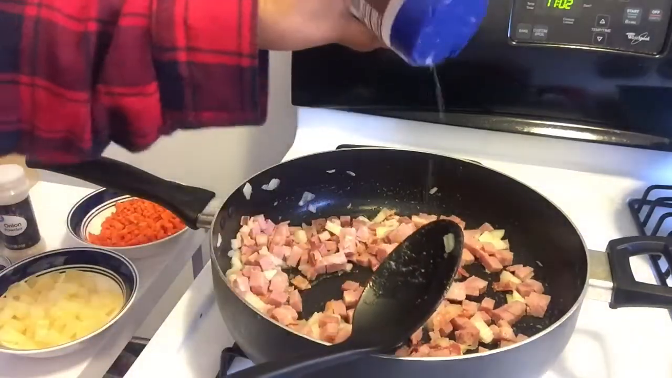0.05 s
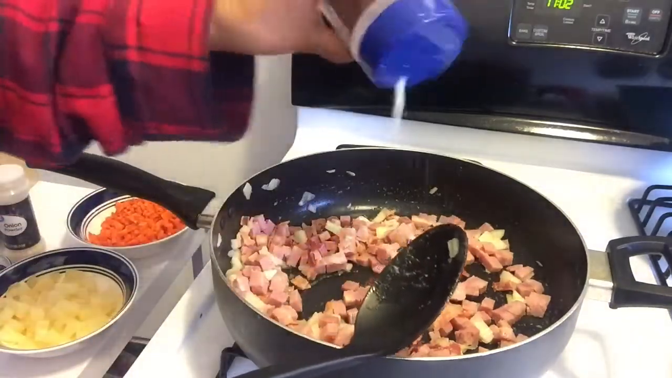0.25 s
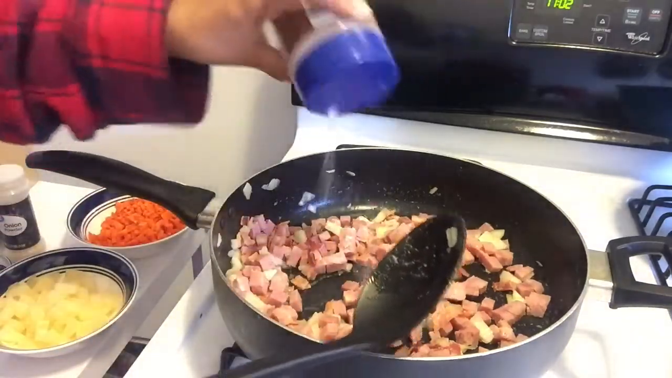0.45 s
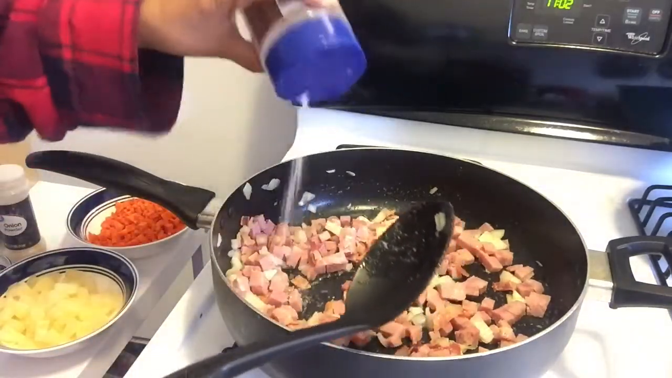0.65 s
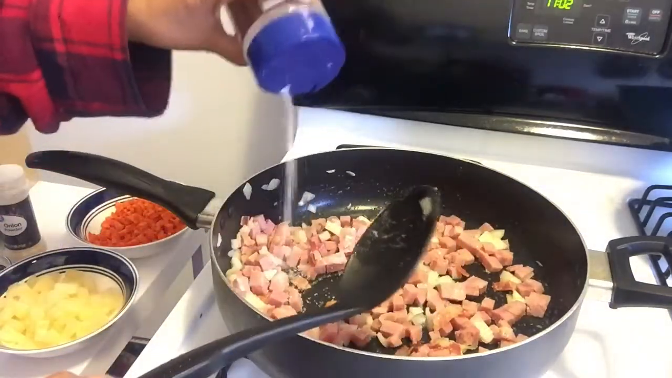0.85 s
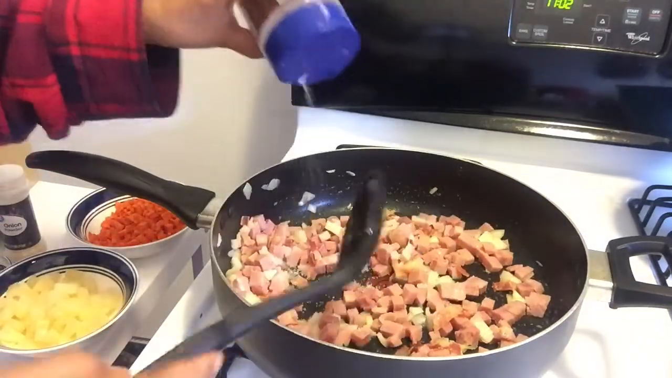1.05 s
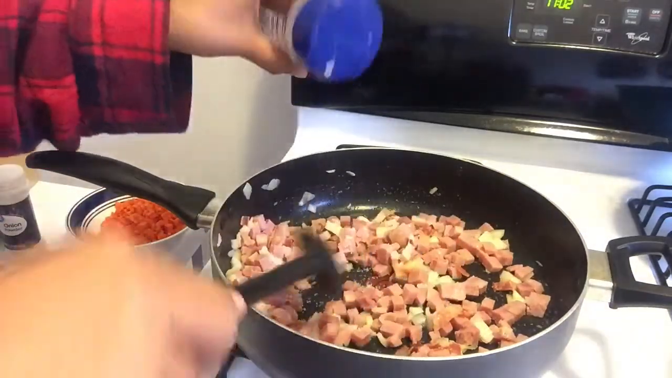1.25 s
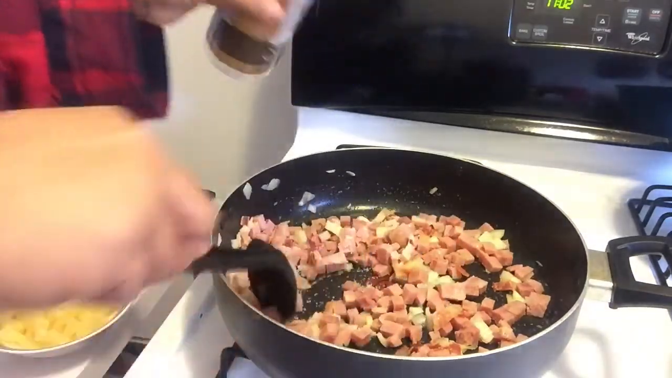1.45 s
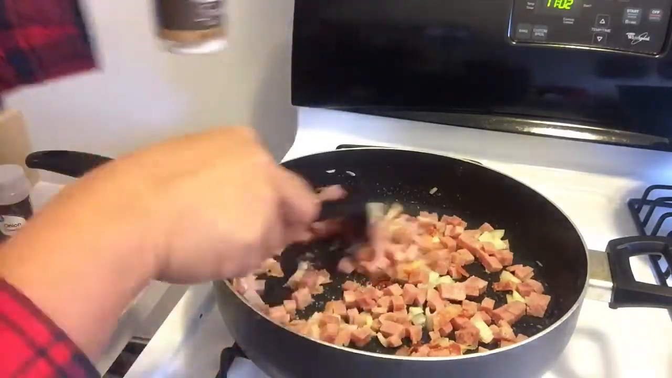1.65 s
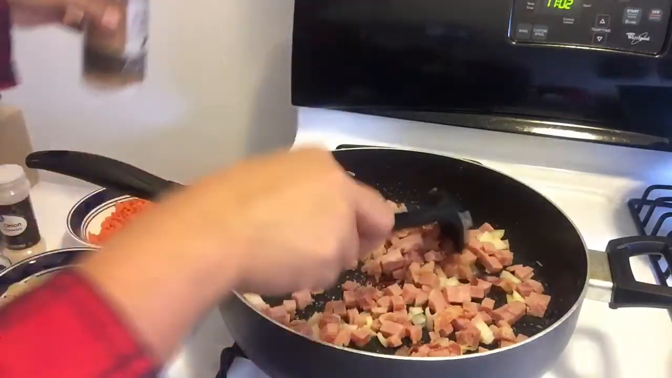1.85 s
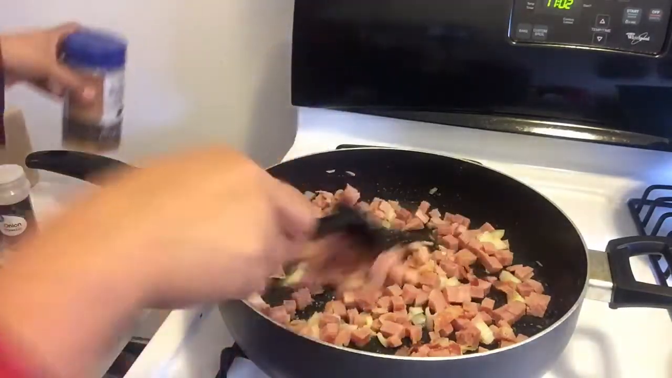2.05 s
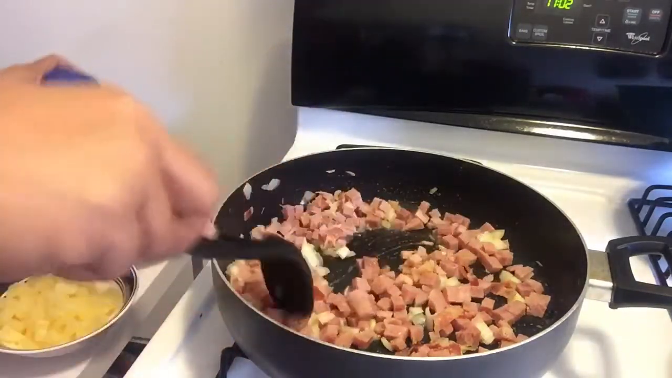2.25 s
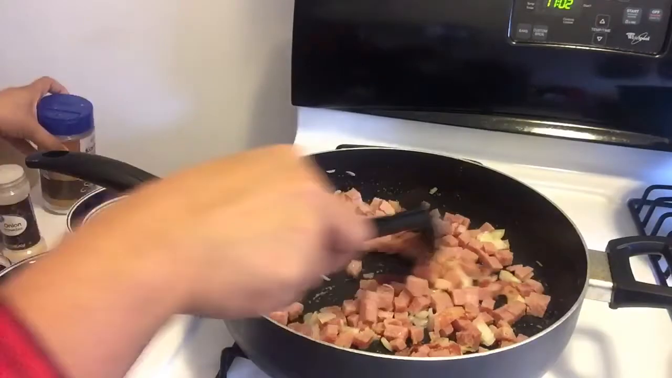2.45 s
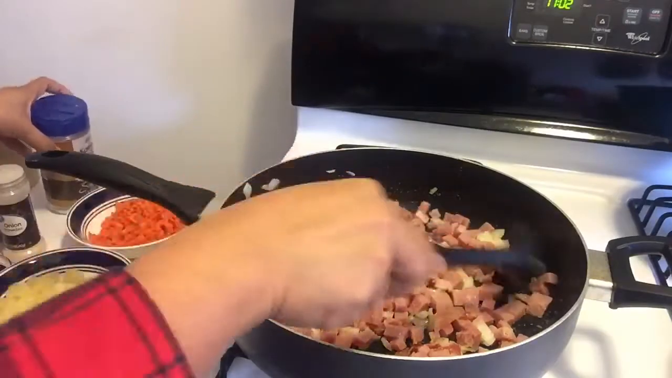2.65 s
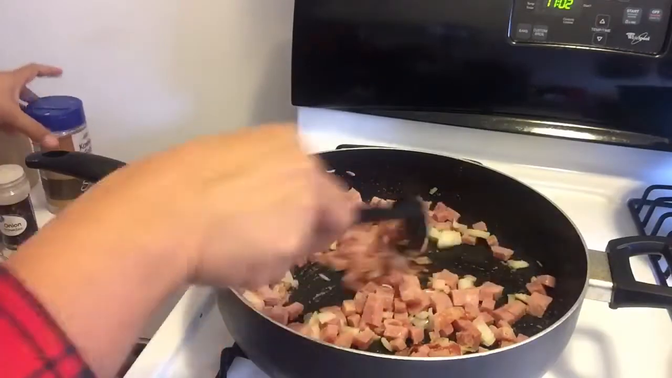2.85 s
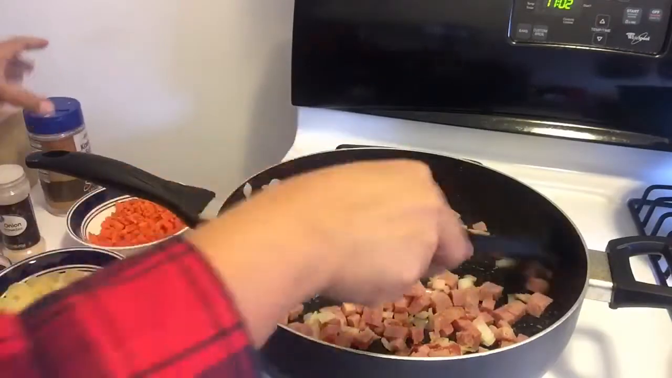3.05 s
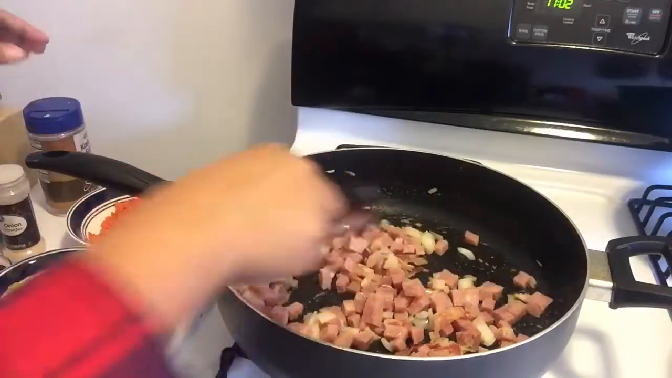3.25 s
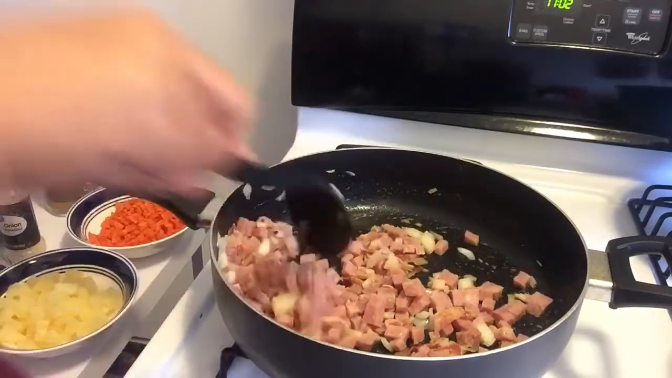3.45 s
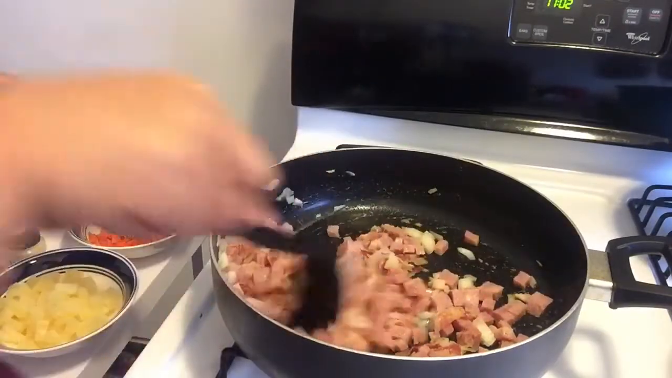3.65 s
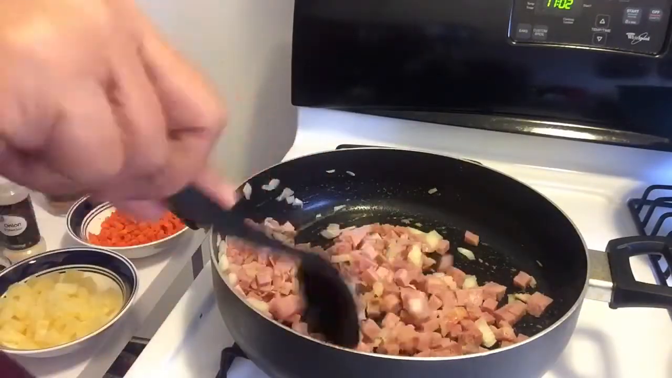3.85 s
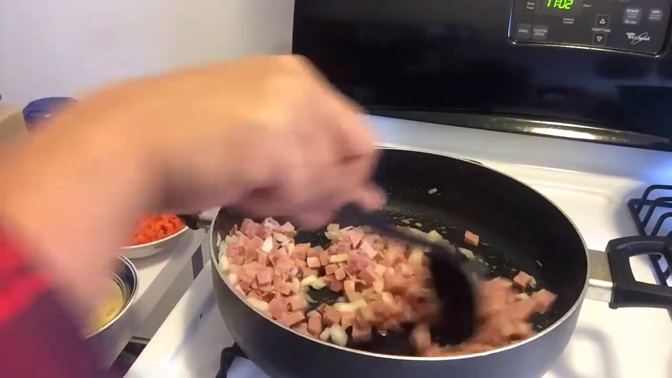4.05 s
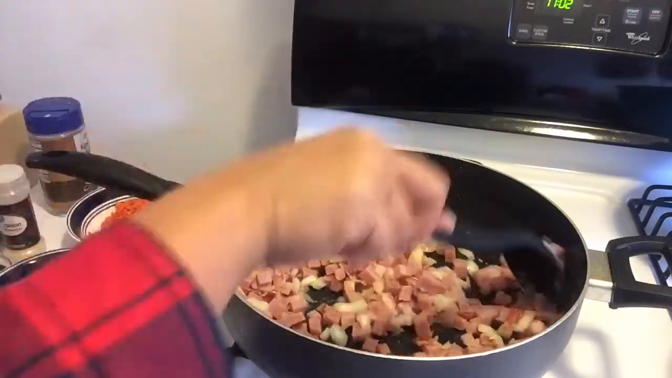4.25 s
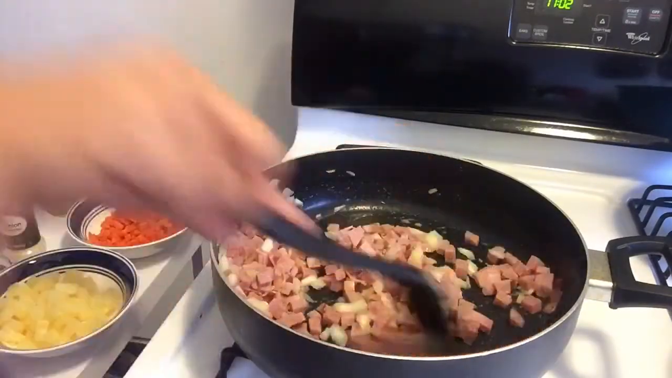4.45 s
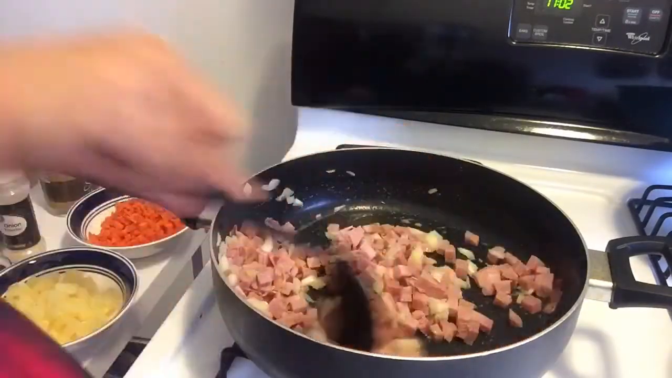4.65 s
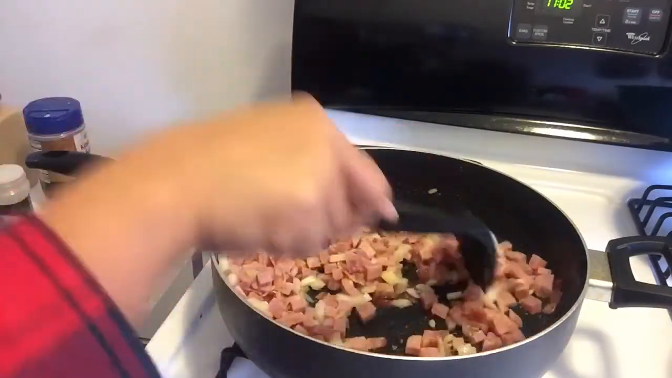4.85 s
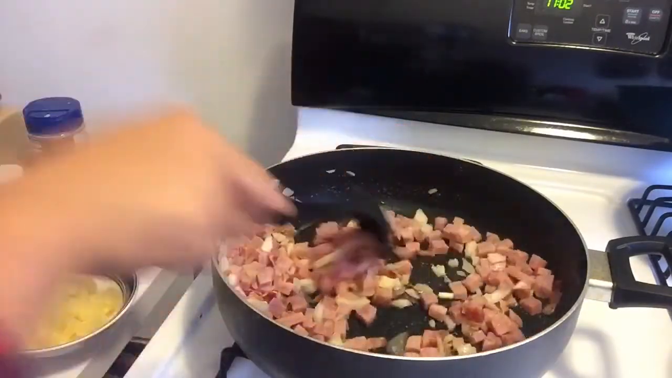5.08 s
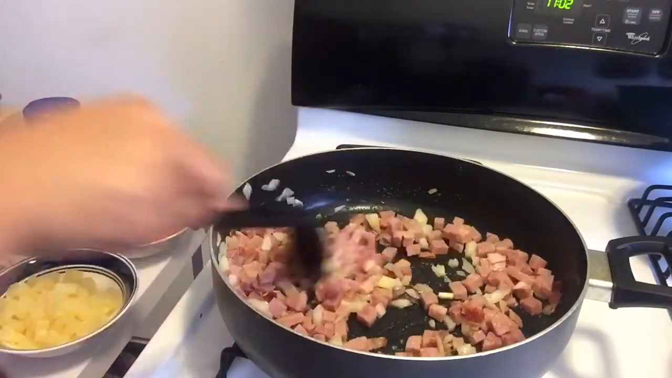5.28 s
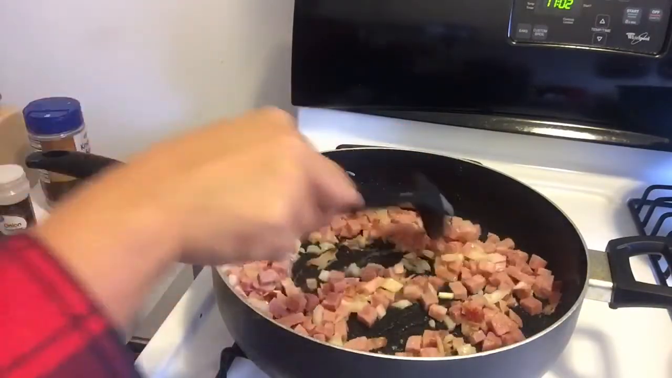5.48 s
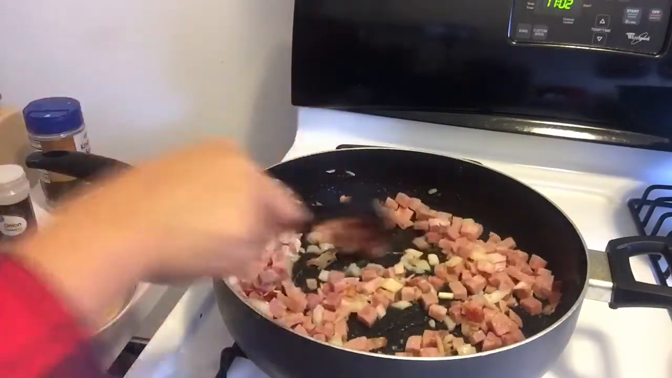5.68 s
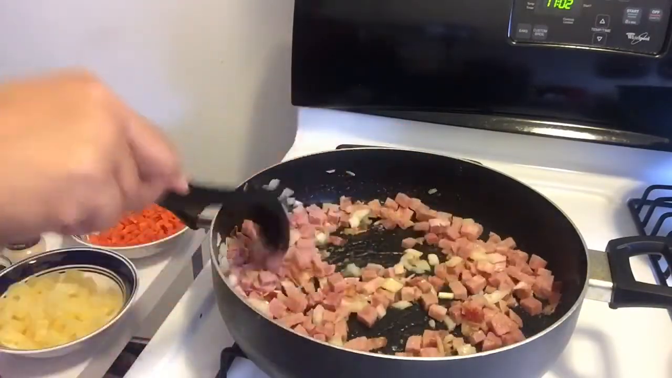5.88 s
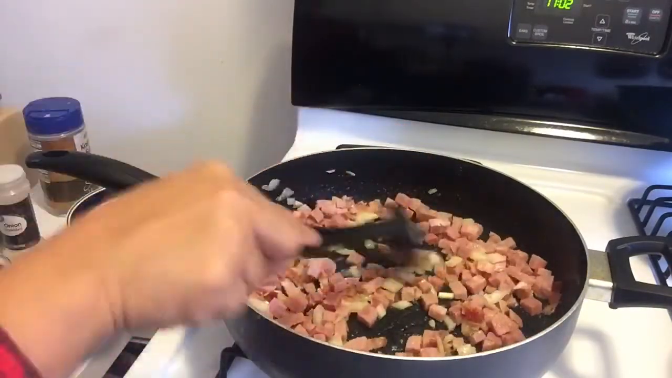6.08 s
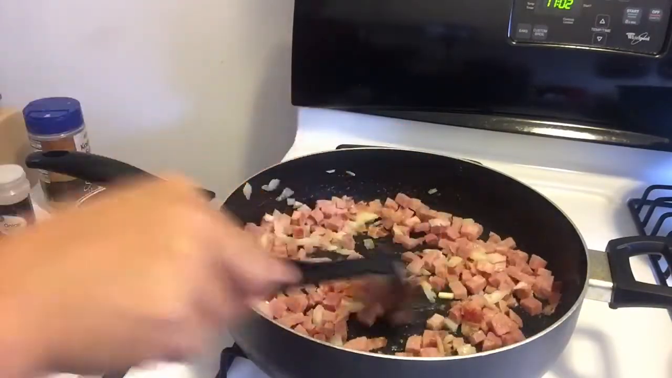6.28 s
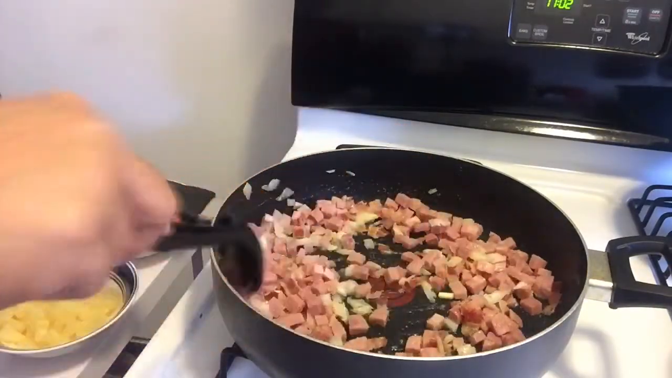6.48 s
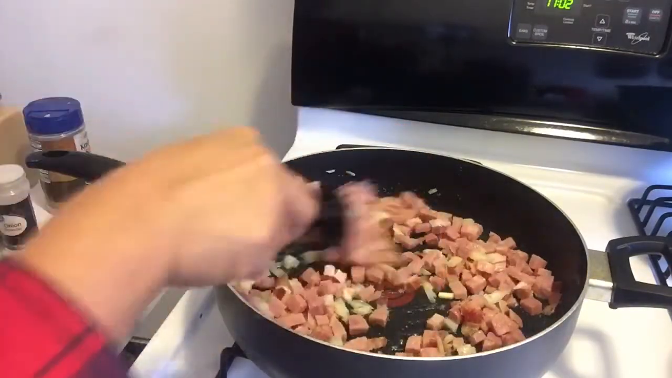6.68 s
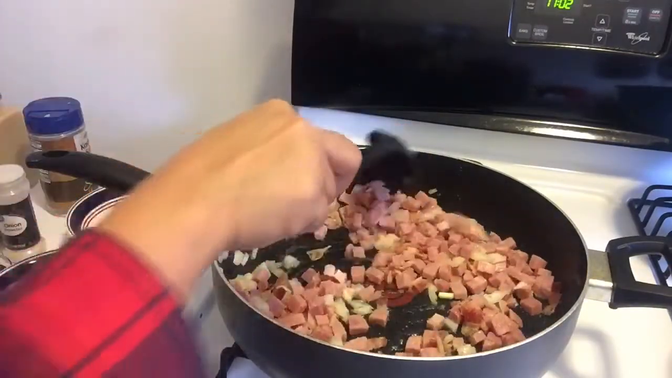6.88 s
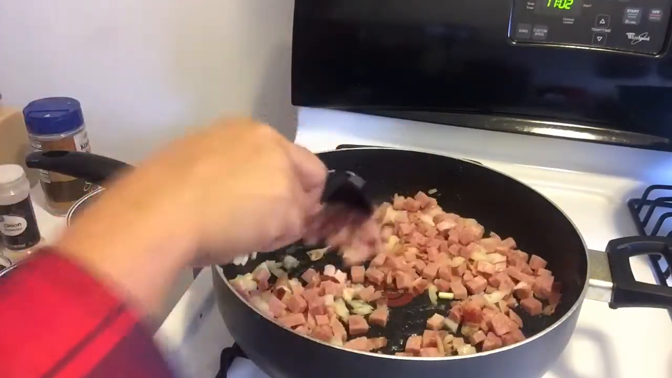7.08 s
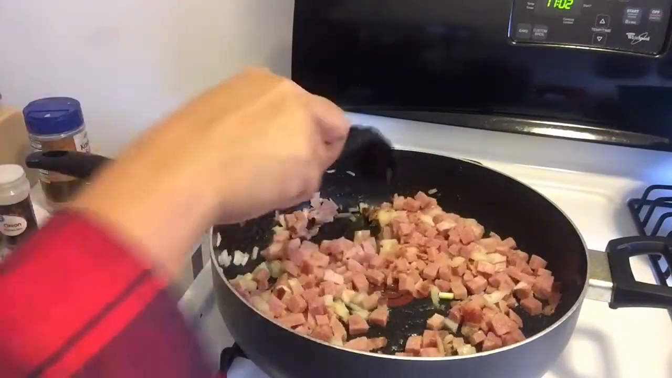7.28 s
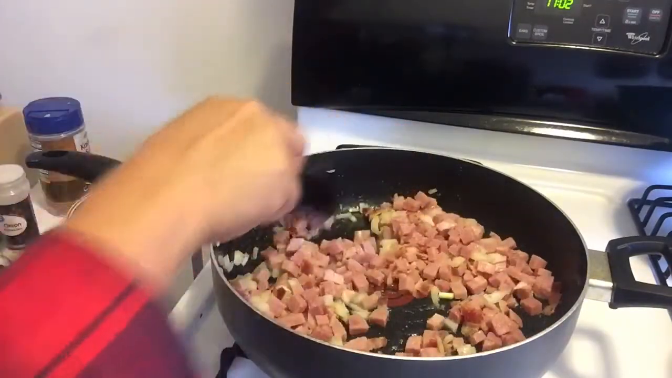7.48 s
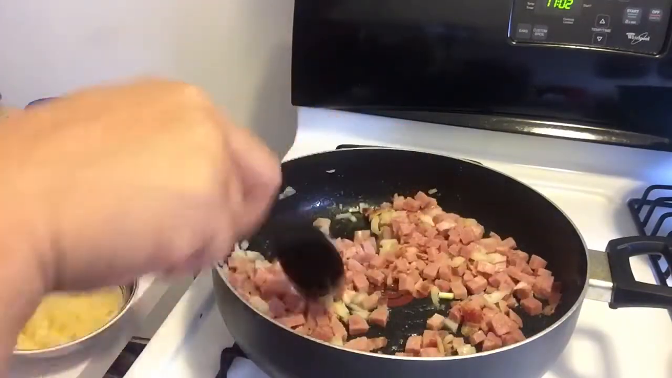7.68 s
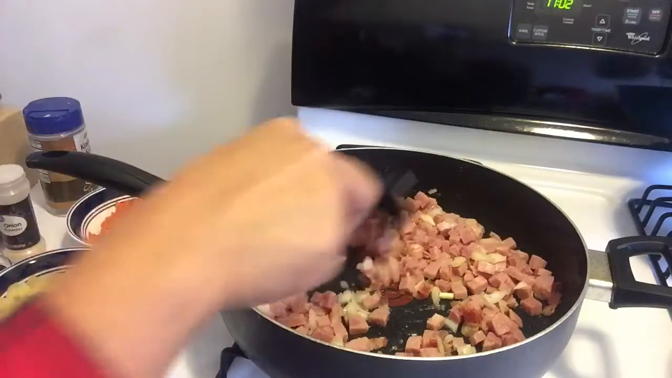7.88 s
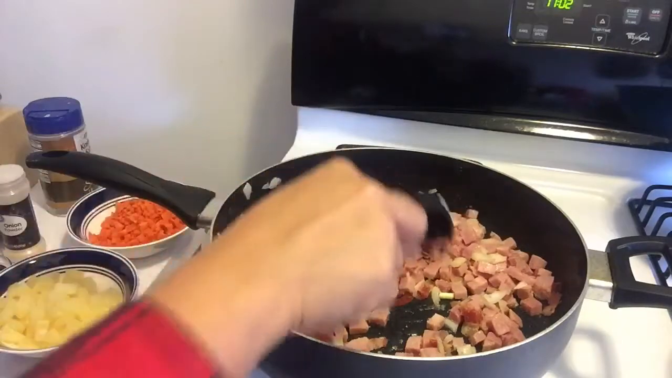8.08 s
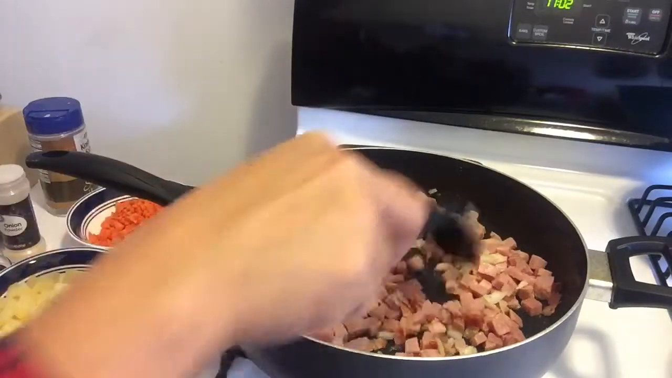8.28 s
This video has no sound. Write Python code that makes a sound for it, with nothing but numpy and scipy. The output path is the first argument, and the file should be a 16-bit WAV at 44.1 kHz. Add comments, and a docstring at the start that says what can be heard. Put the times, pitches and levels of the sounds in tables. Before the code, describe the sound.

A few light shakes of salt, followed by a plastic spoon knocking and swishing through chopped food in a pan.

```python
"""Salt patters into a frying pan, then a plastic spoon clacks and scrapes through diced food.
The crystals land in bright showers. The spoon drags on the coating, swishes over dice and salt and
shakes the pan on its grate; each knock sets the pan ringing, damped by the food. Wet dice tick and
pop as they let go. Behind it all are a few soft low bumps, the short echo of a small kitchen and
the faint hiss of the room and one close microphone."""
import sys
import numpy as np
from scipy import signal
from scipy.fft import rfft, irfft, next_fast_len
from scipy.io import wavfile
from scipy.ndimage import uniform_filter1d, map_coordinates

SR = 44100
rng = np.random.default_rng(int(sys.argv[2]) if len(sys.argv) > 2 else 0)


def int16_out(signal):
    """Quantize to a 16-bit WAV file."""
    q = np.round(np.clip(np.atleast_2d(signal).T, -1, 1) * 32767)
    wavfile.write(sys.argv[1], SR, q.astype(np.int16))


N = 367353

# Each row: start, rise and hold in seconds, base fade in dB per second, levels in dB of drag, swish,
# fine salt and pan rattle, then the spoon's hollow and the rattle's pitch in Hz.
SPOON_STROKES = [(1.446, 0.141, 0.0055, 400, -70, -55, -55.5, -86, 1800, 250),
                 (1.573, 0.016, 0.068, 187, -38, -44.5, -58, -55.5, 1400, 340),
                 (1.58, 0.076, .09, 249, -56.5, -46.5, -49.5, -62, 1650, 420),
                 (2.005, 0.021, 0.012, 297, -65, -91, -90, -61.5, 900, 497),
                 (2.043, 0.041, 0.0059, 199, -41, -62.5, -85, -62.5, 872, 540),
                 (2.049, .07, 0.0088, 350, -32, -60, -63, -54, 1200, 540),
                 (2.372, 0.015, 0.013, 257.5, -26.5, -39.5, -53, -35.5, 1120, 490),
                 (2.508, .022, 0.0063, 232.5, -28.5, -42, -54.5, -33.5, 1100, 440),
                 (2.766, 0.083, 0.043, 219.5, -65.5, -70.5, -75.5, -70, 1350, 310),
                 (2.972, 0.0066, 0.0043, 400, -65, -92, -88, -48.5, 1000, 340),
                 (3.009, 0.023, 0.053, 302, -70, -98, -97, -53.5, 900, 300),
                 (3.122, 0.011, 0.02, 145, -48.5, -55.5, -63.5, -60, 2250, 305),
                 (3.13, 0.05, 0.071, 296, -46, -42.5, -52, -68.5, 2200, 256),
                 (3.24, 0.027, 0.011, 303, -49.5, -64, -80, -65, 1100, 399),
                 (3.335, 0.014, 0.0065, 300, -62, -58, -75.5, -83.5, 1780, 340),
                 (3.372, .01, .02, 504, -44.5, -53, -70.5, -60.5, 1690, 505),
                 (3.412, 0.022, .02, 251.5, -68, -62, -67.5, -72.5, 1900, 240),
                 (3.67, 0.013, 0.014, 301.5, -55.5, -75, -81, -46, 950, 234),
                 (3.708, .012, 0.013, 267, -30.5, -44, -60.5, -33.5, 1900, 330),
                 (3.9, 0.051, 0.012, 304, -64.5, -72, -79.5, -57, 1750, 205),
                 (3.959, 0.0074, 0.0046, 403, -27.5, -46, -66, -49.5, 1570, 338),
                 (3.965, 0.023, 0.028, 302, -59.5, -70.5, -85, -40, 1570, 338),
                 (4.036, .01, .005, 216, -35.5, -41.5, -60, -34, 1690, 260),
                 (4.296, 0.021, 0.0027, 304.5, -74.5, -66, -87.5, -77, 2970, 213),
                 (4.324, 0.016, 0.02, 153, -88, -95, -95, -60, 1860, 195),
                 (4.442, .05, .005, 200, -76, -68, -77, -90, 1900, 220),
                 (4.746, 0.0081, .005, 350, -29, -40, -56.5, -35.5, 1180, 370),
                 (4.801, 0.0071, .005, 232, -40, -50.5, -67.5, -37.5, 1080, 440),
                 (5.016, 0.078, 0.011, 102, -75, -69.5, -77, -68, 1240, 270),
                 (5.335, 0.046, 0.0059, 400, -70, -62, -73, -65.5, 1980, 190),
                 (5.383, .06, 0.026, 200, -75.5, -64, -69, -67, 1400, 190),
                 (5.718, 0.0065, 0.0026, 194, -30, -45.5, -71, -42, 1150, 536),
                 (5.743, .03, 0.006, 258, -32, -47.5, -63, -48.5, 1370, 520),
                 (6.0, 0.06, .01, 97, -71, -71.5, -72, -76, 1500, 348),
                 (6.584, 0.0053, 0.0043, 296.5, -32.5, -58, -81, -57, 1600, 330),
                 (6.626, .06, .15, 399.5, -71.5, -61.5, -67.5, -72.5, 1800, 290),
                 (7.006, 0.017, 0.012, 450, -57, -56.5, -83, -60, 1200, 330),
                 (7.119, 0.039, .02, 203, -87, -70.5, -82, -77, 1400, 200),
                 (7.422, 0.043, 0.0054, 348.5, -46.5, -65, -68.5, -51.5, 1000, 270),
                 (7.491, 0.078, .005, 303.5, -46.5, -47, -66, -77, 1600, 310),
                 (7.6, 0.03, 0.017, 201, -80, -85, -90, -62, 1360, 341),
                 (7.609, 0.01, 0.0027, 404, -48, -48, -62, -63, 1360, 390),
                 (7.831, 0.015, 0.0047, 150, -69, -68.5, -68.5, -77, 1900, 390),
                 (7.907, 0.031, .005, 250, -81, -68, -79, -85, 1500, 320),
                 (8.16, 0.05, .005, 247, -72, -74, -93.5, -75, 1440, 290),
                 (8.231, 0.061, 0.0041, 603, -68, -69.5, -78, -79, 1300, 270)]
# Multipliers on a stroke's fade, for drag, swish, fine salt and rattle.
FADE_SCALES = [1.064, 1.25, 1.1, .7]
# Each row: start in seconds, level in dB, clack and upper clack in Hz, then trims in dB for
# upper clack, grate, thud, crack, pan ring and rim ring.
SPOON_KNOCKS = [(1.579, -18, 1270, 2900, -9.5, -19.5, -21, -18, -12, -13.5),
                (2.378, -5, 1298, 3170, -5.5, -30, -18.5, -15, -12.5, -29),
                (2.519, -21, 1357, 2370, -25, -13, 1, -14, -6, -29),
                (2.988, -45, 580, 2570, -28, -13.5, 5, -42, -20, -11),
                (3.123, -29.5, 2200, 2230, -29, -33, -22, -23, -14, -22),
                (3.377, -39.5, 1300, 2780, 4, -33, -19.5, -25, -14, -36.5),
                (3.444, -43, 1890, 2650, -3.5, -25.5, -28, -14.5, -18, -43),
                (3.677, -45.5, 933, 2160, 3, -8, -6.5, -16, -21.5, 1),
                (3.713, -8.5, 1538, 3100, 5.5, -30.5, -18.5, -14.5, -13, -30.5),
                (3.958, -9.5, 1884, 2800, 2, -42, -18.5, -11.5, -14, -18.5),
                (4.043, -18, 1290, 2530, -12, -29, -16, -14.5, -25, -26),
                (4.076, -22.5, 1710, 2380, 7, -28, -21, -22.5, -12.5, -27),
                (4.745, -18, 487, 1500, 1, -3.5, -18, -21.5, -5.5, -35.5),
                (4.803, -19, 1062, 2270, -15, -14, -16, -37, -18, -25),
                (5.7158, -11.5, 954, 1898, -1, -41.5, -16, -22, -16.5, -11),
                (6.581, -9, 1802, 2286, -15, -33.5, -26.5, -19, -21, -27),
                (7.015, -60, 1114, 2700, -2, -30, -20, 8.5, -23, -29),
                (7.442, -36, 970, 2665, 6.5, -3.5, -6.5, 5, -3, 3),
                (7.559, -30, 1746, 3230, 0, -44, -38, -29, -22, -19),
                (7.627, -30, 1346, 3080, -25, -43, -21, -29, -30, -36),
                (7.846, -48.5, 1138, 3000, -3, -15, -25, -25, -4.5, -19)]
# Each row: pitch in Hz, level in dB, seconds to fall 60 dB.
PAN_MODES = [(158, 0.5, 0.14), (240, -7, 0.12), (352.3, -10.5, 0.4), (460, -2.5, .15), (529, -7.5, 0.1),
             (659, 4, 0.031), (996, -0.5, 0.31), (1175, 6, 0.046), (1366, -2.5, 0.027), (1572, -2, 0.11),
             (1728, -11, 0.18), (2840, -1.5, 0.039), (3340, -15, 0.14), (4470, -11.5, 0.14),
             (5416, -19.5, 0.098)]
# Low resonances of pan and grate. Each row: centre in Hz, width in Hz, level in dB.
RATTLE_MODES = [(125.3, 41, -0.5), (208, 30, -3), (327, 30, -1), (495, 86, -7), (575.6, 120, -4.5)]
# Each row: start, rise and hold in seconds, fade in dB per second, level in dB, then trims in dB
# for brightness and hollow pan tone.
SALT_SHAKES = [(-.06, 0.12, 0.017, 450, -55.5, -4, -16), (0.18, 0.029, 0.0038, 271, -67, 0.5, -9),
               (0.275, 0.087, .01, 202, -49, 0, -11), (0.356, 0.057, .01, 258.5, -47.5, -2.5, -16),
               (0.443, 0.1, 0.0076, 135, -48, -5.5, -11), (0.579, 0.1, 0.027, 99, -51.5, -4.5, -8),
               (0.793, 0.042, .02, 250, -62.5, -2.5, -11), (0.953, 0.016, 0.0042, 260, -57, -12, -11),
               (1.047, .06, .05, 144, -78, -9, -20)]
# Each row: start in seconds, level in dB, pitch in Hz.
DICE_TICKS = [(.2099, -56, 1490), (.8275, -39.5, 4320), (.9647, -46.5, 4500), (1.4296, -53, 4300),
              (2.8099, -39.5, 4660), (3.2251, -27.5, 4130), (3.3348, -40, 5600), (3.4038, -34, 2840),
              (4.3256, -44, 3160), (4.4851, -53.5, 3390), (5.1161, -49, 5150), (5.3749, -44, 4200),
              (5.4502, -41, 6120), (6.0721, -49, 6050), (6.4099, -50.5, 5460), (6.692, -48, 6050),
              (6.7121, -43, 3420), (6.7473, -44, 4320), (6.7823, -44, 5720), (7.1761, -40.5, 5200),
              (7.877, -54, 3010), (7.9249, -44, 8900), (7.9462, -47, 9050)]
# Each row: ratio to the tick's pitch, linear gain.
POP_PARTIALS = [(1, 1), (1.2, .6), (.85, .4), (1.7, .2)]
# Each row: time in seconds, level in dB, pitch in Hz.
LOW_BUMPS = [(2.4, -62, 50), (2.55, -67, 70), (3.73, -62, 50), (4.05, -64, 45), (4.37, -64, 45.3),
             (4.77, -63, 45), (7.237, -54, 56.5), (7.769, -64, 94.8)]
# Each row: frequency in Hz, seconds for the echo to fall 60 dB.
KITCHEN_DECAY = [(100, 0.68), (300, 0.06), (800, 0.3), (2000, 0.25), (5000, 0.28), (12000, 0.22)]
# Tone curves for the noise layers. Each row: frequency in Hz, level in dB.
DRAG_EQ = [(180, -42), (300, -19.5), (666, -3.5), (1030, 0), (1140, -5), (1400, -2.5), (1520, -7.5),
           (1780, -1), (2720, -6), (3420, -9), (9000, -32), (11700, -59), (19800, -120)]  # spoon on the coating
SWISH_EQ = [(1650, -28.5), (2800, -3), (3240, -5.5), (3490, -0.5), (5180, -3), (5880, -0.5), (6850, -4),
            (8410, -16.5), (9000, -20), (11700, -41.5), (19800, -120)]  # spoon over the food
FINE_SALT_EQ = [(5000, -30.5), (8500, 0), (9600, -1), (10500, -6.5), (12500, 1), (16000, -10.5)]  # salt under the spoon
SHOWER_EQ = [(410, -53), (700, -22), (1040, -6), (1330, -5.5), (1640, -8), (2240, -2), (2800, -0.5),
             (4430, 5.5), (4920, 2.5), (6570, 5), (10400, -12), (11800, -6), (16000, -12)]  # salt landing
HISS_EQ = [(12, -35.5), (20, -13), (53, -1), (310, -4.5), (399, -5), (873, -9), (1030, -7.5), (1120, -6),
           (1220, -12), (1400, -8), (1860, -10), (2200, -11), (6720, -16), (13900, -25.5), (16000, -28)]  # room and microphone


def spoon_knocks():
    """Each blow is a short plastic clack, a crack, and the pan ringing under damping food."""
    clack_cycles, dull_hz = 33, 1000  # cycles to fall 60 dB; lower clacks decay like one at dull_hz
    out, t = np.zeros(N), np.arange(SR // 2) / SR
    crack_band = signal.butter(2, [3200, 7000], "bandpass", fs=SR)
    push = 1 - np.exp(-(t / 0.0011) ** 2)  # plastic gives a little before it pushes
    bloom = 1 - np.exp(-t / .003)
    for start, db, hz, upper_hz, *trims in SPOON_KNOCKS:
        upper_db, grate_db, thud_db, crack_db, pan_db, rim_db = trims
        noise, luck = rng.standard_normal((2, len(t)))
        t60 = clack_cycles / max(hz, dull_hz)
        lower = ring(hz, t60, t) + .5 * ring(0.68 * hz, t60, t) + .5 * ring(1.2 * hz, t60, t)
        upper = (ring(upper_hz, 0.52 * t60, t) + 0.4 * ring(.8 * upper_hz, 0.63 * t60, t)
                 + 0.3 * ring(1.25 * upper_hz, 0.87 * t60, t))
        clack = push * (lower + amp(upper_db) * upper)
        burst = noise * amp(crack_db - 60 * t / 0.013) * (.3 + push)
        crack = 4 * signal.lfilter(*crack_band, burst)
        pan = np.zeros(len(t))
        for (f, mode_db, life), scatter_db in zip(PAN_MODES, 2 * luck):
            # where and how flat the spoon lands decides which family of modes it feeds
            feed_db = grate_db if f < 260 else thud_db if f < 700 else rim_db if f < 1100 else pan_db
            pan += amp(mode_db + scatter_db + feed_db) * ring(f, life, t)
        add(out, start - .0004, amp(db) * (0.86 * clack + crack + 0.57 * pan * bloom))
    return out


def spoon_strokes():
    """The spoon's edge drags on the coating, swishes over dice and salt, and rattles the pan."""
    *levels_db, hollow_hz, rattle_hz = np.transpose(SPOON_STROKES)[4:, :, None]
    gains = [amp(db) * gestures(SPOON_STROKES, scale)[0] + 1e-9
             for db, scale in zip(levels_db, FADE_SCALES)]
    drag_env, swish_env, salt_env, rattle_env = [per_sample(np.linalg.norm(g, axis=0)) for g in gains]
    rattle_env = uniform_filter1d(rattle_env, size=700)  # the heavy pan is slower
    _, fading_s = gestures(SPOON_STROKES)
    settling_hz = rattle_hz * 2 ** (-2 * fading_s)  # sinks two octaves a second as the pan settles
    rattle_centre = np.maximum(follow_loudest(settling_hz, gains[3]), 120)
    drag_centre = follow_loudest(hollow_hz, gains[0])
    drag = grit(drag_tone, spread_db=2.6, lump_db=1.5, patchy_db=4.0)
    drag = hollow(drag, drag_centre, lift_db=4, octaves=0.49, under_db=5)
    rattle = grit(rattle_tone, spread_db=2.8, lump_db=3.5, patchy_db=1.5)
    rattle = hollow(rattle, rattle_centre, lift_db=11.5, octaves=0.66, under_db=1.44)
    swish = grit(eq(SWISH_EQ), spread_db=2.0, lump_db=1.5, patchy_db=3.0)
    salt = grit(eq(FINE_SALT_EQ), spread_db=3.0, lump_db=-1.3, patchy_db=1.5)
    return drag_env * drag + swish_env * swish + salt_env * salt + rattle_env * rattle


def drag_tone(hz):
    """Dragging drives the pan's modes, each as wide as its decay is short."""
    peaks = sum(0.5 / (1 + ((hz - centre) * life / 2.5) ** 2) for centre, _, life in PAN_MODES)
    return eq(DRAG_EQ)(hz) * (1 + peaks)


def rattle_tone(hz):
    """The low body of pan and grate: resonances summed in alternating polarity."""
    return sum((-1) ** k * amp(db) * 1j * hz * width / (centre ** 2 - hz ** 2 + 1j * hz * width)
               for k, (centre, width, db) in enumerate(RATTLE_MODES))


def salt_showers():
    """Each shake drops a shower of crystals; on bare metal they sound brighter and wake the pan."""
    flow_db, bright_db, tone_db = np.transpose(SALT_SHAKES)[4:]
    envelopes, _ = gestures(SALT_SHAKES)
    shower = grit(eq(SHOWER_EQ), spread_db=4.05, lump_db=1.8, patchy_db=2.3)
    top = filtered(shower, lambda hz: hz > 8500)
    low = filtered(shower, lambda hz: hz < 2600)
    bands = [(shower - top - low, flow_db), (top, flow_db + bright_db), (low, flow_db + tone_db)]
    return sum(unit(band) * per_sample(amp(db) @ envelopes) for band, db in bands)


def dice_ticks():
    """Wet dice let go of the pan with tiny spitting pops, over a faint random patter."""
    pop_cycles, spit_db = 62, -20  # cycles to fall 60 dB; the hiss in each pop
    out, t = np.zeros(N), np.arange(SR // 50) / SR
    patter = rng.random((110, 3)) * [N / SR - .1, 9, 10000] + [0, -66.5, 3001]  # seconds, dB, Hz
    for start, db, hz in np.vstack([DICE_TICKS, patter]):
        spit = np.diff(rng.standard_normal(len(t) + 1)) * amp(spit_db - 60 * t / 0.0062)
        pop = sum(gain * ring(ratio * hz, pop_cycles / hz, t) for ratio, gain in POP_PARTIALS)
        attack = 1 - np.exp(-t * hz / 1.2)
        add(out, start, amp(db) * (pop * attack + spit))
    return out


def low_bumps():
    """Soft bass pushes that swell and fade."""
    out, t = np.zeros(N), np.arange(SR // 4) / SR
    swell = (t / 0.024) * np.exp(1 - t / 0.022)
    for time, db, hz in LOW_BUMPS:
        add(out, time - .03, amp(db) * np.sin(2 * np.pi * hz * t) * swell)
    return out


def kitchen_echo(x):
    """The walls answer, each band dying at its own speed; the hands move, so it changes every 0.3 s."""
    out, step = np.zeros(N), SR * 3 // 10
    for start in range(0, N, step):
        hz, t, noise = signal.stft(rng.standard_normal(SR // 2), SR, nperseg=256)
        decay = amp(-60 * t / along(KITCHEN_DECAY, hz)[:, None])
        tail = signal.istft(noise * decay, SR, nperseg=256)[1]
        echo = signal.fftconvolve(x[start:start + step], tail / np.linalg.norm(tail))
        add(out, start / SR + .004, echo)
    return out


def room_hiss():
    """A faint bed of room tone and microphone noise."""
    return amp(-70) * grit(eq(HISS_EQ), spread_db=1.6, lump_db=-1.0, patchy_db=2.0)


def grit(colour, spread_db, lump_db, patchy_db):
    """Dense micro-impacts of uneven size, in lumps and in streaks of colour; rms 1."""
    size_db = spread_db * np.minimum(rng.exponential(1, N), 5)
    hits = rng.standard_normal(N) * amp(size_db + lump_db * wobble(120))
    spectrum = signal.stft(hits, nperseg=512)[2]
    streaks = uniform_filter1d(rng.standard_normal(spectrum.shape), size=3, axis=0)
    streaks = uniform_filter1d(streaks, size=8, axis=1)
    streaked = signal.istft(spectrum * amp(patchy_db * unit(streaks)), nperseg=512)[1][:N]
    return unit(filtered(streaked, colour))


def hollow(x, centre_hz, lift_db, octaves, under_db):
    """Sweep a resonance over x, thinning it by under_db per octave below the centre."""
    hz, t, spectrum = signal.stft(x, SR, nperseg=512)
    frames = np.minimum((t * SR).astype(int), N - 1)
    away = np.log2((hz[:, None] + 1) / centre_hz[frames])
    lift = amp(lift_db * np.exp(-(away / octaves) ** 2) + under_db * np.clip(away, -3, 0))
    power = np.mean(abs(spectrum) ** 2, axis=1, keepdims=True)
    lift /= np.sqrt(np.sum(power * lift ** 2, axis=0) / np.sum(power))  # hold the loudness
    return signal.istft(spectrum * lift, SR, nperseg=512)[1][:N]


def gestures(rows, fade_scale=1):
    """Per row and millisecond: the gain of a rise, hold and fade, and the seconds spent fading."""
    start, rise, hold, fade = np.transpose(rows)[:4, :, None]
    t = np.arange(N * 1000 // SR + 2) / 1000 - start
    fading_s = np.maximum(t - rise - hold, 0)
    swell_db = -34.5 * np.clip(1 - t / rise, 0, 9) ** 2
    return amp(swell_db - fade_scale * fade * fading_s), fading_s


def follow_loudest(hz, gains):
    """A pitch curve that leans toward the loudest stroke."""
    return per_sample(np.average(hz * np.ones_like(gains), axis=0, weights=gains ** 2))


def per_sample(curve):
    """Millisecond values read at every sample."""
    return np.interp(np.arange(N) * 1000 / SR, np.arange(len(curve)), curve)


def ring(hz, t60, t):
    """A damped sine."""
    return np.sin(2 * np.pi * hz * t) * amp(-60 * t / t60)


def wobble(rate):
    """A smooth random curve, rate knots a second."""
    return map_coordinates(rng.standard_normal(int(N * rate / SR) + 4), [np.arange(N) * rate / SR])


def filtered(x, response):
    """x shaped by a frequency response."""
    size = next_fast_len(N + SR // 2)
    return irfft(rfft(x, size) * response(np.fft.rfftfreq(size, 1 / SR)), size)[:N]


def eq(curve):
    """A tone curve's gain as a function of frequency."""
    return lambda hz: amp(along(curve, hz))


def along(points, hz):
    """(Hz, value) points read on a log axis."""
    freqs, values = np.transpose(points)
    return np.interp(np.log(hz + 1), np.log(freqs + 1), values)


def add(track, start, sound):
    """Mix a sound in at start seconds."""
    part = track[round(start * SR):][:len(sound)]
    part += sound[:len(part)]


def amp(db):
    """Decibels to gain."""
    return 10 ** (np.asarray(db) / 20)


def unit(x):
    """Scaled to rms 1."""
    return x / np.sqrt(np.mean(x ** 2) + 1e-20)


def scene():
    """Everything in the pan and its echo, over low bumps and hiss."""
    knocks = spoon_knocks()
    textures = salt_showers() + spoon_strokes() + dice_ticks()
    hiss = room_hiss()
    echo = kitchen_echo(amp(-10.0) * knocks + amp(-11.5) * textures)
    low_cut = signal.butter(3, 110, "highpass", fs=SR, output="sos")  # little of this passes below 110 Hz
    pan = signal.sosfilt(low_cut, knocks + textures + echo)
    return (pan + low_bumps() + hiss)[None]


def record(dry):
    """Roll off the deepest bass and cut the very top."""
    low_hz, top_hz = 38, 15900
    return filtered(dry[0], lambda hz: (hz < top_hz) / np.sqrt(1 + (low_hz / (hz + 1)) ** 6))[None]


dry = scene()
out = record(dry)
int16_out(out)
```